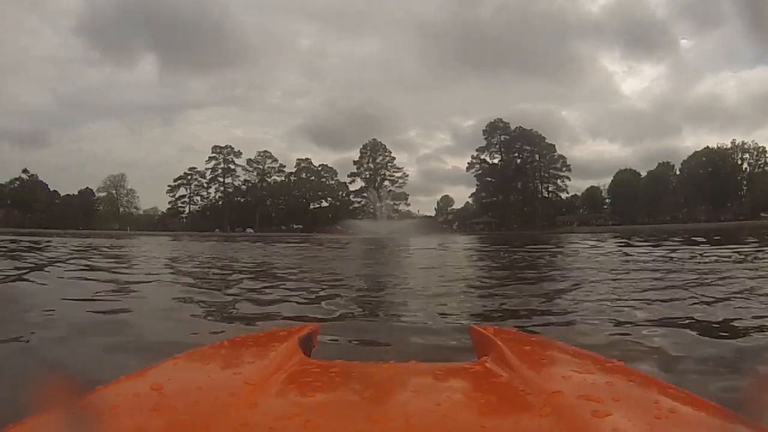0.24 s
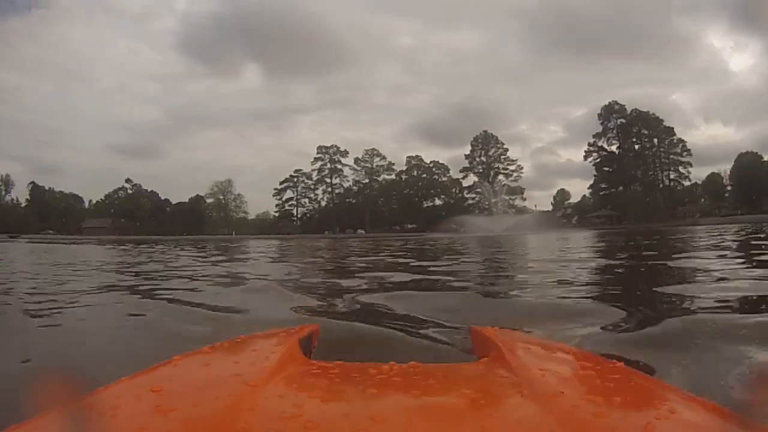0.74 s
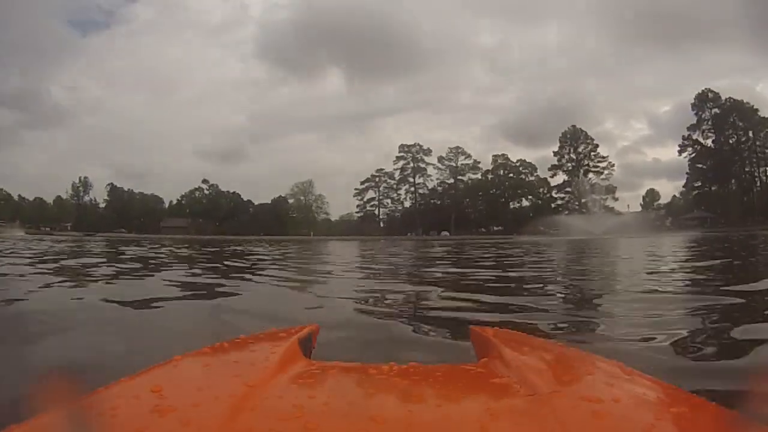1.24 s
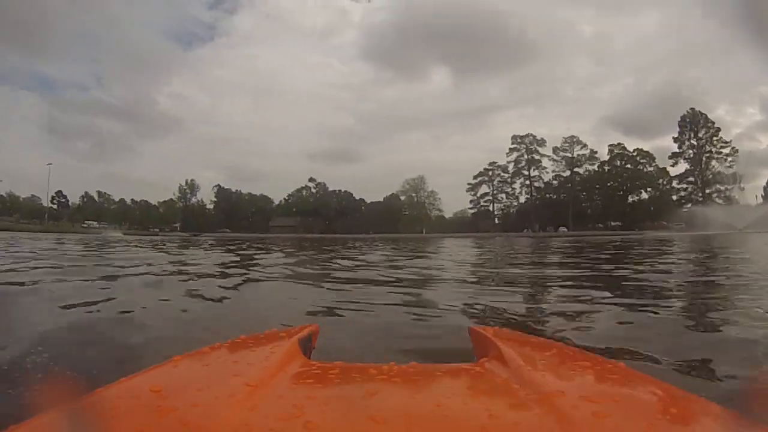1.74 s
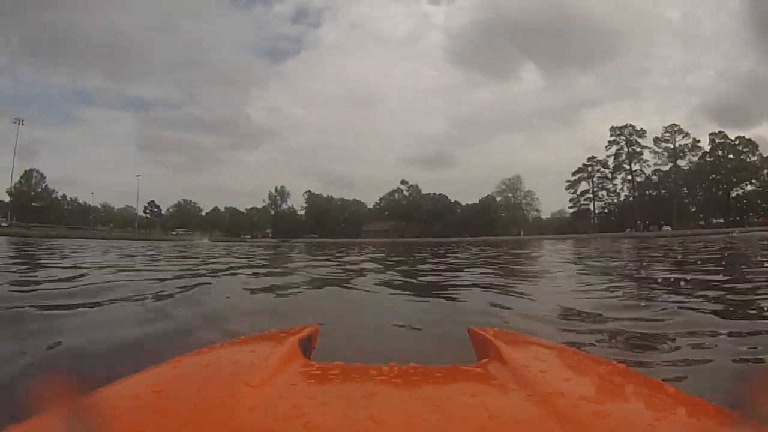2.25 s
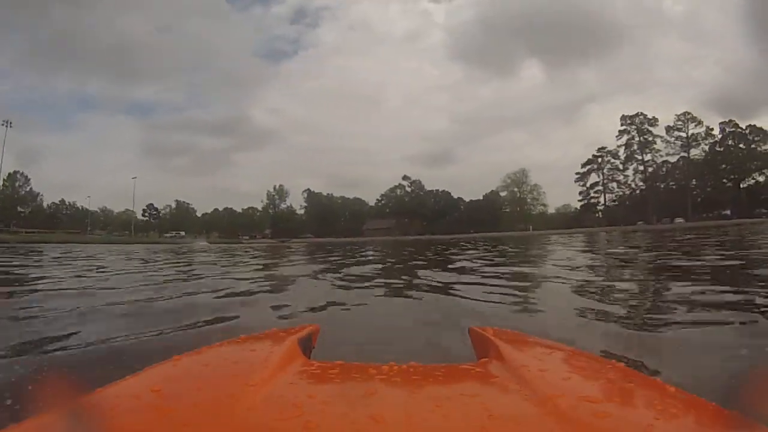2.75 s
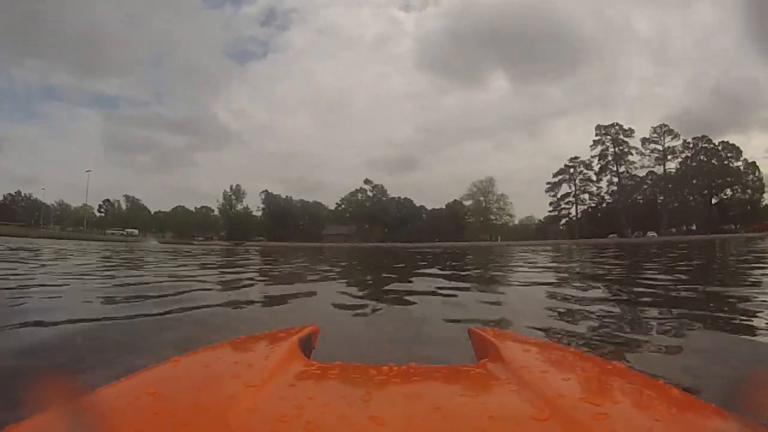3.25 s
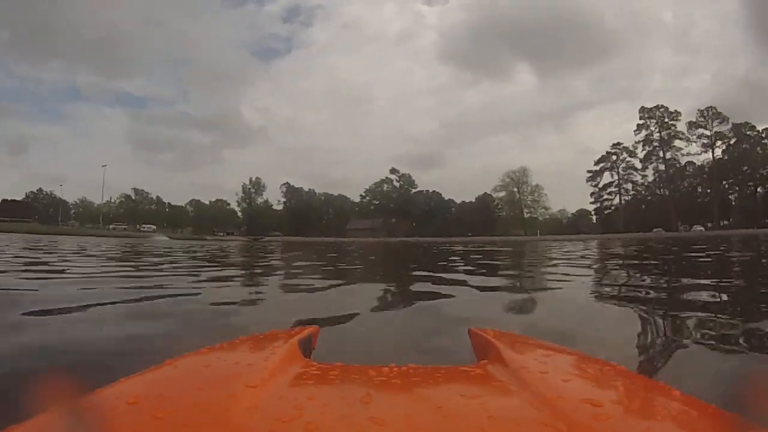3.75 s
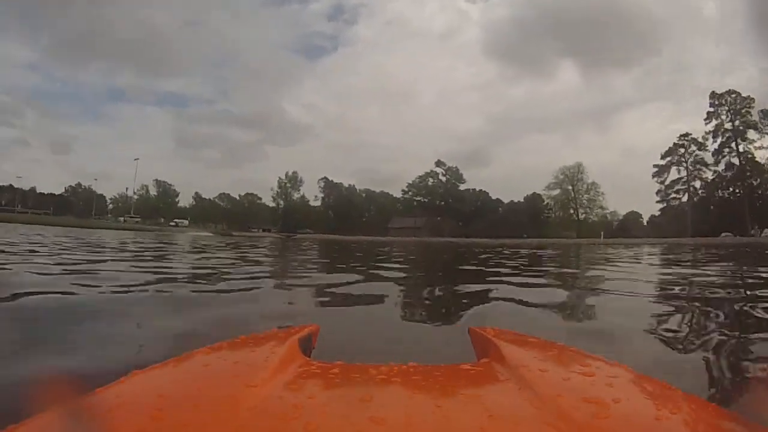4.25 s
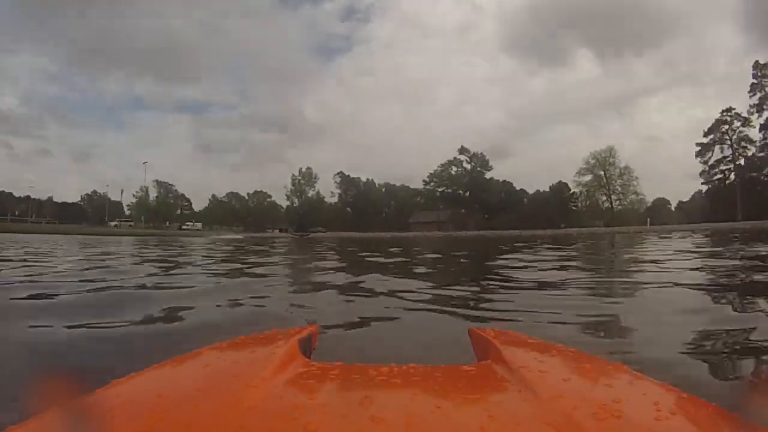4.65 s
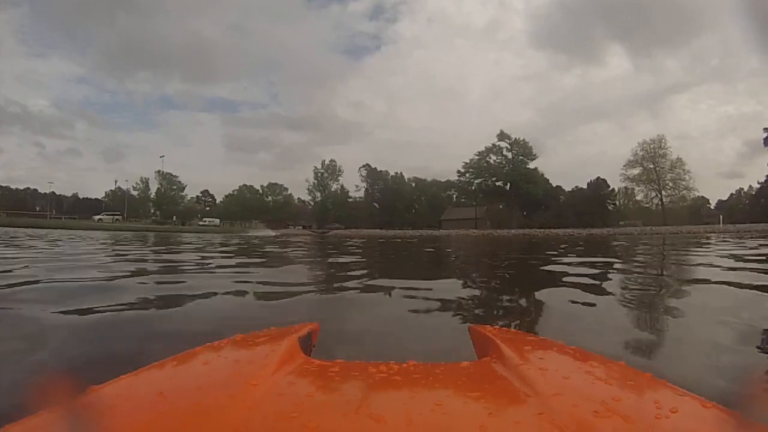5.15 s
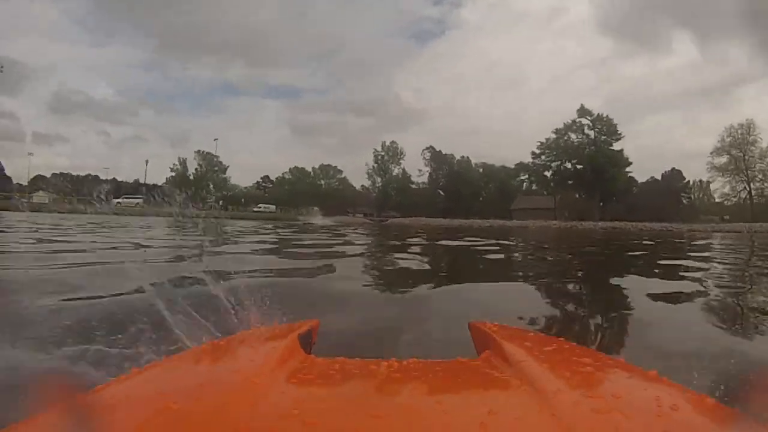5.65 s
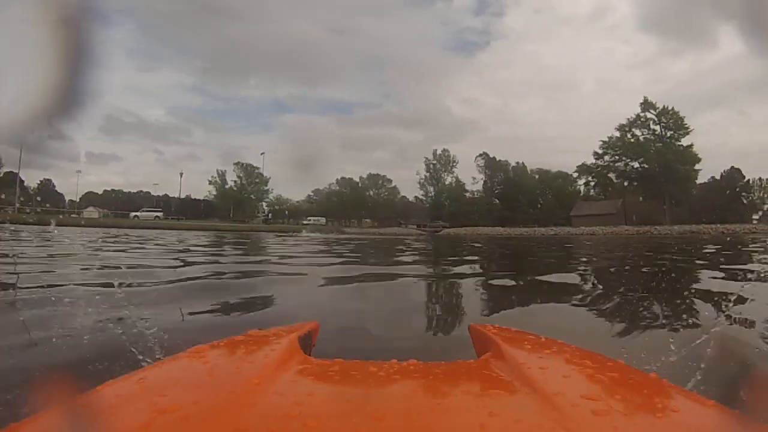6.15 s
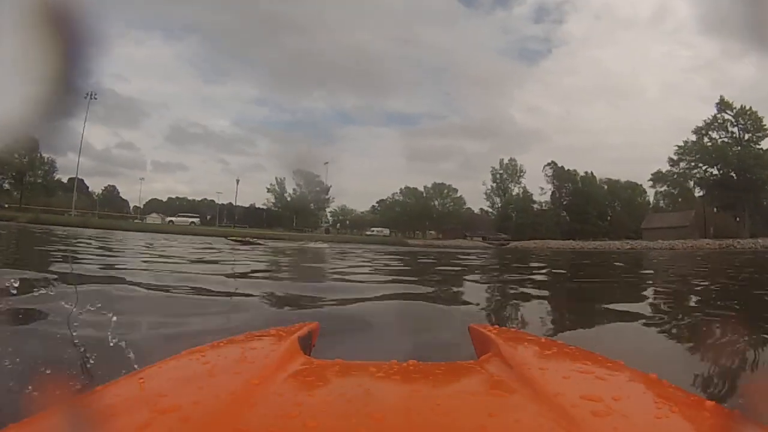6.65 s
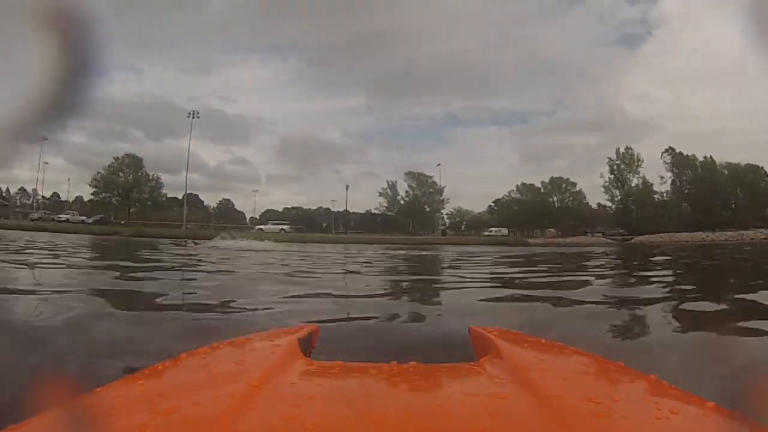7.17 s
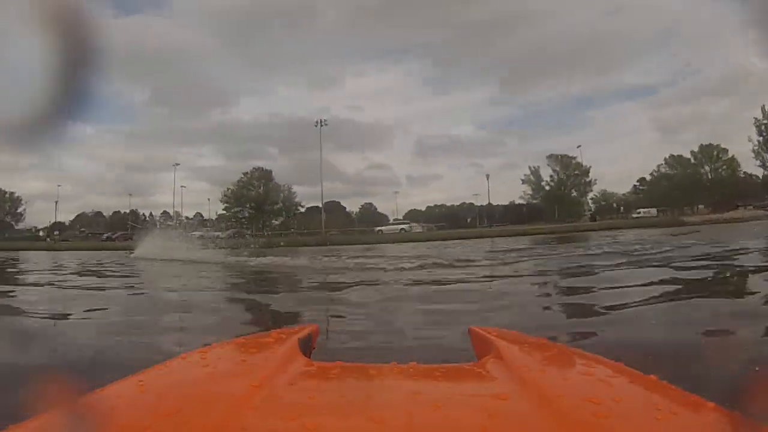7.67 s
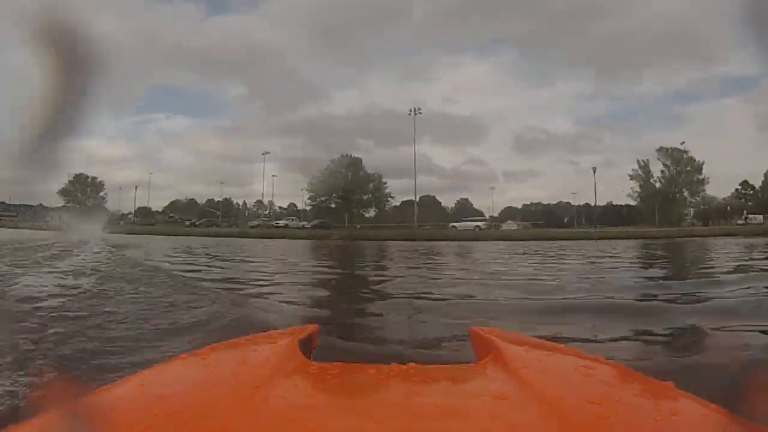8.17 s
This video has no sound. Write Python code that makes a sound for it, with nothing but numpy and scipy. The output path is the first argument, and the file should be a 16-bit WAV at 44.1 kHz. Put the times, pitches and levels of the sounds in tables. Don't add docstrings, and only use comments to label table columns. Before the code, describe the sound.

A sealed microphone on a model boat's hull gives a close, muffled, midrange-heavy sound on a lake. At 0 s a high electric whine quickly falls to a lower, rough, gargling buzz, with propeller churn, rushing water and faint spray hiss. Slaps and hollow low booms hit around 0.2-0.5, 1-1.5 and 2-2.7 s. Near 2.8 s the throttle opens: pitch jumps by about half and holds as a smoother, singing whine until about 5 s, with a boom at 3.4 s and resonant knocks at 4.2-5 s. Pitch then slides down and the drive cuts at 5.6 s, leaving quieter wash, ticking droplets and a weak propeller spin fading by 6.2 s. Very heavy booms and thuds land at 6.5-6.7 s with a faint, very high servo squeak. At 6.8 s the motor bites back, rises quickly, dips slightly and runs on unevenly, with a slap and boom at 8 s, until 8.4 s.

```python
import sys
import numpy as np
from scipy import signal
from scipy.fft import rfft, irfft
from scipy.io import wavfile
from scipy.ndimage import uniform_filter1d, minimum_filter1d

SR = 44100
rng = np.random.default_rng(int(sys.argv[2]) if len(sys.argv) > 2 else 0)


def transcribe(signal):
    frames = np.atleast_2d(signal).T
    limited = np.clip(frames, -1, 1)
    pcm = np.round(limited * 32767).astype(np.int16)
    wavfile.write(sys.argv[1], SR, pcm)


def natural_amplitude(level_db):
    exponent = np.asarray(level_db, float) / 20
    return 10 ** exponent


N = 370881
POWER_OFF_S, POWER_ON_S = 5.62, 6.768
POLE_ORDER = 6


def rms_one(x):
    return x / np.sqrt(np.mean(x ** 2) + 1e-20)


def in_time(rows):
    s, *columns = np.transpose(rows)
    return [np.interp(np.arange(N) / SR, s, c) for c in columns]


def at_hz(points, hz):
    points = np.array(points)
    return np.interp(np.log(hz + 1), np.log(points[:, 0]), points[:, 1])


def drift(rate):
    r = np.exp(-16 * np.pi * rate / SR)
    noise = rng.standard_normal(N // 8 + 4002)
    slow = signal.lfilter([1], [1, -2 * r, r * r], noise)[4000:]
    return np.interp(np.arange(N) / 8, np.arange(len(slow)), rms_one(slow))


def band(x, order, low_hz, high_hz):
    return signal.sosfilt(signal.butter(order, [low_hz, high_hz], "band", fs=SR, output="sos"), x)


def lagged(x, lag_s):
    r = np.exp(-1 / (lag_s * SR))
    return x[0] + signal.lfilter([(1 - r) ** 2], [1, -2 * r, r * r], x - x[0])


def ring(clicks, hz, t60):
    r, w = natural_amplitude(-60 / (t60 * SR)), 2 * np.pi * hz / SR
    return signal.lfilter([0, np.sin(w)], [1, -2 * r * np.cos(w), r * r], clicks + 1e-18)


def coloured(x, *spectra):
    size = 4096
    hz = np.arange(size // 2 + 1) * SR / size
    power = sum(natural_amplitude(at_hz(points, hz) + db) ** 2 for points, db in spectra)
    cepstrum = irfft(np.log(power) / 2)
    cepstrum[1:size // 2] *= 2
    cepstrum[size // 2 + 1:] = 0
    pulse = irfft(np.exp(rfft(cepstrum)))
    return signal.fftconvolve(x, pulse / np.linalg.norm(pulse))[:N]


# frequency in Hz, level in dB per Hz.
HULL = [(41, -25.5), (70, -25.5), (107, -46), (240, -8.5), (289, -3.5), (461, -20), (650, -12.5),
        (725, -28.5), (974, 2), (1100, 3), (1550, -3.5), (1650, -11), (2090, -6), (2410, -15), (2900, -35),
        (3770, -73.5), (6380, -120)]
# frequency in Hz, level in dB per Hz.
CASE = [(2300, -34.5), (2600, 0), (2930, -4.5), (3420, 9), (3620, 0.5), (3900, 5.5), (4150, 4),
        (4350, -0.5), (4700, -6), (4950, -3), (5300, -31), (5700, -47), (9000, -93.5)]


def through_hull(x):
    return coloured(x, (HULL, 0), (CASE, -22.5))


# start in seconds, duration in seconds, new speed in turns per second.
THROTTLE = [(.173, .126, 227), (.45, .12, 232), (.59, .05, 226), (.715, .085, 250.5), (1.16, .121, 260.3),
            (1.66, .062, 249.8), (2.06, .31, 246.5), (2.39, .08, 249.5), (2.5, .27, 244),
            (2.807, .122, 365.5), (3.0, .93, 376.6), (5.053, .246, 279.7), (5.271, .205, 237),
            (5.451, .097, 186.8), (5.568, .558, 80.2), (6.2, .5, 62), (6.712, .234, 241.8),
            (7.011, .249, 289.2), (7.249, .17, 272), (7.6, .6, 276.5), (8.21, .06, 269), (8.29, .05, 282)]


def shaft_speed():
    t, old = np.arange(N) / SR, 368.5
    demand = np.full(N, old)
    for s, taking, new in THROTTLE:
        demand += (new - old) * np.clip((t - s) / taking, 0, 1)
        old = new
    return lagged(demand, .025)


# centre in seconds, loss of order 1 in dB, loss of the upper orders in dB.
SLIPS = [(.02, 11, -6), (.3, 8, 5.5), (.47, 3, 10), (1.8, 7.5, 9), (2.08, 5, 6), (2.13, 6, 2.5),
         (2.81, 4, -1.5), (2.93, -0.5, 13), (3.04, -0.5, -1), (5.39, -4.5, -2), (6.93, -1, -0.5),
         (7.47, 7.5, -1), (8.32, 10, 5.5), (.19, 5, 1.5), (3.68, 1, -0.5), (4.89, 1, -1), (7.0, -6, -0.5),
         (8.2, 13, 0), (.07, 10, -1.5), (.56, 3, -1.5), (3.3, -4.5, 2), (5.3, -7, 0), (7.2, 4.5, 0.5),
         (7.66, 3.5, 4)]


def slips():
    t, loss_db = np.arange(N) / SR, np.zeros((2, N))
    half_s = 0.042
    for s, *depth_db in SLIPS:
        near = slice(*np.searchsorted(t, [s - half_s, s + half_s]))
        loss_db[:, near] += np.outer(depth_db, 1 - np.abs(t[near] - s) / half_s)
    return loss_db


# frequency in Hz, gain in dB.
UNBALANCE = [(130, -27), (190, -31.5), (228, -27.5), (250, -23), (280, -22), (320, -16.5), (365, -11.5),
             (377, -16.5)]
# frequency in Hz, gain in dB.
ORDER_TOPS = [(500, -19.5), (740, 1), (850, -5.5), (1000, 4.5), (1150, 5.5), (1300, 1.5), (1500, -4.5),
              (1750, -16.5), (2250, -12), (2700, -56), (3400, -20), (4100, -20.5), (4900, -35),
              (7000, -74.5)]
# shaft speed in Hz, order 2 in dB, order 3 in dB, order 4 in dB.
BLADES = [(207, -6, -10, -2.5), (211, -3.5, 4.5, -0.5), (240.6, 4, -3.5, 0), (259, -6.5, 9.5, 5.5),
          (278.3, 3, 1, -2), (380, 5, 3, 0)]
# orders 2, 3, 4 and the higher ones in dB.
LIFT_DB = (3.5, -3.5, -2.5, 2)
# time in seconds, bite in dB, uneven share from 0 to 1, shaft whirl in dB,
# bow lift around -1 to 1.
LOAD = [(0, -19, 0.22, -5.5, -1.1), (.2, -16.5, 0.25, -4, -.6), (.3, -19.5, 0.5, 2.5, 0.12),
        (.65, -23.5, 0.83, 5.5, -0.72), (.86, -19, 0.37, 0, 0.39), (1.76, -21, 0.37, 1.5, -0.33),
        (2.76, -16.5, 0.37, 2.5, 0.32), (3.0, -19.5, 0.32, -7, -0.23), (3.5, -19.5, 0.18, -5.5, -0.85),
        (3.95, -17.5, 0.1, -2.5, 1.0), (5.05, -19.5, 0.07, -5, 0.4), (5.22, -18, 0.35, -7.5, 0),
        (5.62, -22.5, 1, 3, -0.52), (6.77, -16, 0.8, 4, -0.14), (6.92, -13.5, 0.18, -11, -1.4),
        (7.1, -16, 0.42, 3.5, 0.6), (7.38, -18.5, 0.4, 5, 0.25), (8.41, -16.5, 0.83, -0.5, -0.94)]


def shaft(speed, turn, pull, powered):
    bite_db, rough, whirl_db, lift = in_time(LOAD)
    rough = np.clip(rough, 0, 1)
    first_loss_db, upper_loss_db = slips()

    first_db = at_hz(UNBALANCE, speed) + 5 * pull + whirl_db - first_loss_db
    first = np.sqrt(2) * natural_amplitude(first_db + 2.3 + 1.94 * drift(17.8)) * np.clip(speed / 60 - 2, 0, 1)
    out = first * np.cos(turn + .15 * drift(17))

    extra_db = {k: at_hz(np.array(BLADES)[:, [0, k - 1]], speed) + lift * LIFT_DB[k - 2] for k in (2, 3, 4)}
    extra_db[POLE_ORDER] = 8 - 8 * rough
    wobble = .05 * rough * drift(30)
    gargle_db = 1.8 * rough * drift(18)
    upper_db = bite_db - upper_loss_db + gargle_db
    for k in range(2, 21):
        order_db = upper_db - 5.5 + at_hz(ORDER_TOPS, k * speed) + extra_db.get(k, 0)
        if k > 4:
            order_db = order_db + lift * LIFT_DB[3]
        lag = 2.3 - 0.37 * drift(0.51)
        phase = k * (turn + wobble) - (k - 1) * lag
        share = rough * (.5 if k >= POLE_ORDER else 1)
        steady = np.sqrt(1 - share) * natural_amplitude(1.3 * drift(6))
        smear = np.sqrt(share / 2)
        in_phase = (steady + smear * drift(42)) * np.cos(phase)
        out += natural_amplitude(order_db) * (in_phase + smear * drift(38) * np.sin(phase))

    free = np.interp(np.arange(N) / SR, [5.64, 5.66, 6.17, 6.19], [0, 1, 1, 0])
    coast = np.sqrt(2) * free * natural_amplitude(-31 + 2.2 * drift(15)) * np.cos(2 * turn + .6 * drift(35))
    return powered * out + coast


# frequency in Hz, level in dB per Hz.
GRILLE = [(4900, -25), (5350, -7), (5700, -4), (6050, -14), (6600, -5.5), (7100, -13.5), (8400, -4.5),
          (9250, -17), (9800, -12), (10600, -12), (11250, -23), (12150, -22), (13400, -37), (14500, -58)]


def churn(speed, turn, pull, powered):
    bite_db = in_time(LOAD)[0]
    speeding = pull.clip(0, 1)
    stirred = np.maximum(pull, lagged(speeding, 0.13)).clip(0, 1)
    idle_db = -38
    driven_db = -29 + 4.5 * stirred + 0.24 * (bite_db + 16.5)
    churn_db = idle_db + powered * (driven_db - idle_db)
    churn_db -= 0.5 * (1 - powered) * (np.arange(N) / SR - POWER_OFF_S - .5)

    spray_idle_db = -64.5
    spray_driven_db = -56 + 5 * lagged(speeding, .1) + .3 * (bite_db + 19.5) + 0.0137 * (speed - 250)
    spray_db = spray_idle_db + powered * (spray_driven_db - spray_idle_db)

    gate = 1 + 0.27 * powered * np.cos(turn)
    lumps = natural_amplitude(0.67 * drift(15) + 1.33 * drift(40))
    bubble_sizes = natural_amplitude(3.87 * np.minimum(rng.exponential(1, N), 5.5))
    grains = rms_one(bubble_sizes * rng.choice([-1, 1], N)) * gate
    spray = coloured(grains * natural_amplitude(0.8 * drift(4.2) + 1.2 * drift(30)), (GRILLE, 0))
    return natural_amplitude(churn_db + 7) * through_hull(grains * lumps) + natural_amplitude(spray_db - 0.5) * spray


# time in seconds, level in dB.
CHOP = [(0, -39), (.2, -29), (2.8, -30), (4.3, -31), (4.8, -25.5), (6.1, -30.5), (6.3, -36), (6.7, -22.5),
        (7.0, -40), (7.7, -34.5), (8.41, -21.5)]


def wash_db():
    thuds = np.zeros(N)
    for s, _, _, thud_db, _ in SLAPS:
        thuds[round(s * SR)] = natural_amplitude(thud_db - 9.5)
    decay = np.exp(-1 / (0.027 * SR))
    surge = lagged(signal.lfilter([1], [1, -decay], thuds), 0.0011)
    return 20 * np.log10(natural_amplitude(in_time(CHOP)[0] - 14) + surge)


def wash(powered):
    white = rng.standard_normal(N) * natural_amplitude(3.3 * drift(9.7))
    dull = natural_amplitude(wash_db() - 0.5) * rms_one(band(white, 2, 100, 260))
    panel_db = -31.0 - 3.5 * (1 - powered)
    panel = natural_amplitude(panel_db) * rms_one(ring(white, 760, .022))
    fizz = natural_amplitude(-62) * rms_one(band(white, 3, 5100, 6500))
    return dull + panel + fizz


def droplets(powered):
    falls = rng.random(N) < (70 - 40 * powered) / SR
    ticks = falls * natural_amplitude(-16 + 3.0 * rng.standard_normal(N))
    bright = signal.sosfilt(signal.butter(1, 2500, "high", fs=SR, output="sos"), ticks)
    return through_hull(bright) + natural_amplitude(-36) * coloured(ticks, (GRILLE, 0))


# start in seconds, end in seconds, frequency in Hz, level in dB.
SQUEAK = (6.68, 6.76, 12350, -70)


def electronics(speed, turn, powered):
    t = np.arange(N) / SR
    level = powered * natural_amplitude(-68 - .05 * (speed - 250) + 3.5 * drift(25))
    carrier = 2 * np.pi * 7774 * t
    chopper = level * (np.sin(carrier) + .8 * drift(80) * np.sin(carrier + POLE_ORDER * turn))
    start, end, hz, squeak_db = SQUEAK
    on = np.interp(t, [start, start + .008, end - .008, end], [0, 1, 1, 0])
    squeak = natural_amplitude(squeak_db - 3 + 2.5 * drift(60)) * np.sin(2 * np.pi * hz * t + .8 * drift(60))
    return chopper + on * squeak


# start in seconds, peak level in dB.
BOOMS = [(0.269, -18), (.39, -19), (.97, -19), (1.35, -25), (1.6, -20), (2.131, -19), (2.32, -18),
         (2.66, -21.5), (2.89, -17.5), (3.13, -22), (3.401, -16.5), (4.75, -29.5), (4.991, -17),
         (5.40, -30), (5.57, -27), (5.979, -25), (6.507, -10.5), (6.626, -5), (7.48, -27), (7.849, -21),
         (8.013, -14.5)]


def booms():
    shaken = band(rng.standard_normal(N + SR), 2, 28, 52)[SR:]
    rumble = natural_amplitude(in_time(CHOP)[0] - 1.0 + 2.0 * drift(10)) * rms_one(shaken)
    click = np.eye(1, SR // 3)[0]
    swing = ring(ring(click, 43, .13), 43, .13)
    swing /= np.abs(swing).max()
    out = np.zeros(N)
    for s, peak_db in BOOMS:
        i = round(s * SR)
        out[i:i + len(swing)] += natural_amplitude(peak_db) * swing
    return out + rumble


# time in seconds, ring level in dB, ring frequency in Hz, thud level in dB,
# splash level in dB.
SLAPS = [(.229, -2, 740, -21, -21), (0.368, -5, 950, -40, -22), (0.532, -9, 2370, -32, -21),
         (.981, -9.5, 635, -24, -20), (1.118, -11, 686, -23, -23), (1.429, -10.5, 670, -23, -27),
         (2.03, -2.5, 1010, -21, -24.5), (2.142, -15, 1060, -21, -19), (4.05, -17, 745, -31, -25),
         (4.227, -10, 694, -31, -28), (4.657, 3, 624, -32, -21.5), (4.769, 1, 735, -18.5, -28),
         (4.996, -2, 746, -15, -24), (5.607, -19, 1120, -15.5, -40), (6.151, -13, 1000, -17.5, -47),
         (6.282, -10, 1090, -45, -42), (6.338, -19, 950, -40, -29), (6.499, -29, 996, -24, -29.5),
         (6.558, -22, 1020, -24, -29), (6.622, -20, 1190, -13, -21), (6.676, -26, 1030, -34, -30),
         (6.722, -6, 930, -16, -24), (6.948, -2, 650, -52, -47), (8.012, -11, 1080, -17, -21)]


def slaps():
    rings, splash, length = np.zeros(N), np.zeros(N), 2600
    age = np.arange(length) / (.0035 * SR)
    noise = rng.standard_normal((len(SLAPS), length)) * age * np.exp(1 - age)
    thud = ring(np.eye(1, length)[0], 230, 0.012)
    for (s, ring_db, hz, thud_db, splash_db), burst in zip(SLAPS, noise):
        i = round((s - .002) * SR)
        panel = ring(burst, hz, .03)
        panel /= np.abs(panel).max()
        splash[i:i + length] += natural_amplitude(min(splash_db, -21) + 6.0) * burst
        rings[i:i + length] += natural_amplitude(min(ring_db, -2) - 6.5) * panel + natural_amplitude(thud_db + 9.5) * thud
    soft = signal.sosfilt(signal.butter(8, 2800, fs=SR, output="sos"), rings)
    return soft + through_hull(splash) + natural_amplitude(-38.0) * coloured(splash, (GRILLE, 0))


def scene():
    t = np.arange(N) / SR
    speed = shaft_speed()
    turn = 2 * np.pi * np.cumsum(speed) / SR
    powered = np.interp(t, [POWER_OFF_S, POWER_OFF_S + .015, POWER_ON_S, POWER_ON_S + .008], [1, 0, 0, 1])
    pull = np.clip(np.gradient(speed) * SR / 770, -1, 1)
    machine = shaft(speed, turn, pull, powered) + electronics(speed, turn, powered)
    water = churn(speed, turn, pull, powered) + wash(powered) + droplets(powered) + booms() + slaps()
    return (machine + water)[None]


def low_pass(x):
    return signal.sosfilt(signal.butter(12, 14200, fs=SR, output="sos"), x)


def record(dry):
    t = np.arange(N) / SR
    over_db = np.maximum(20 * np.log10(np.abs(dry[0]) + 1e-9) + 1.6, 0)
    held_db = np.maximum.accumulate(over_db + 250 * t) - 250 * t
    ahead_db = uniform_filter1d(-minimum_filter1d(-held_db, size=129), size=129)
    ending = np.clip((t[-1] - t) / .003, 0, 1)
    return low_pass(dry * natural_amplitude(-ahead_db) * ending)


dry = scene()
out = record(dry)
transcribe(out)
```